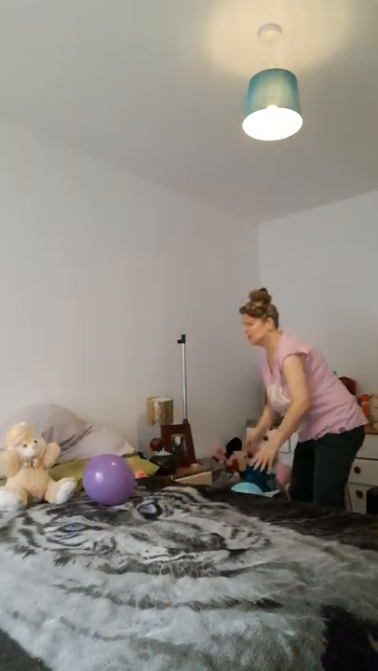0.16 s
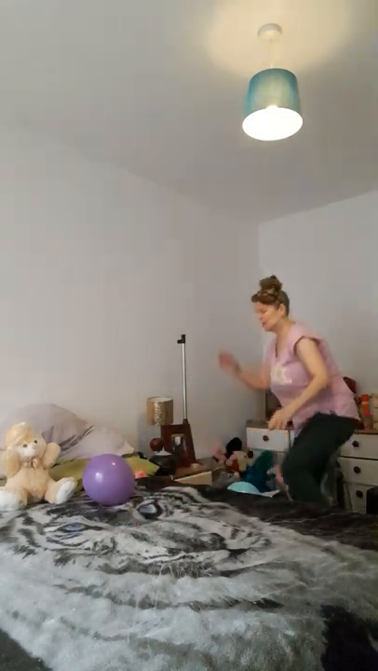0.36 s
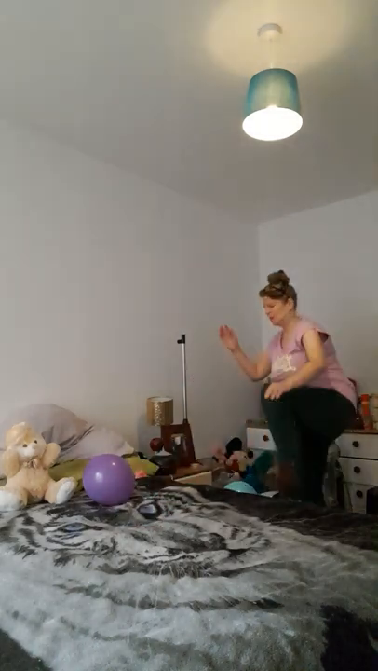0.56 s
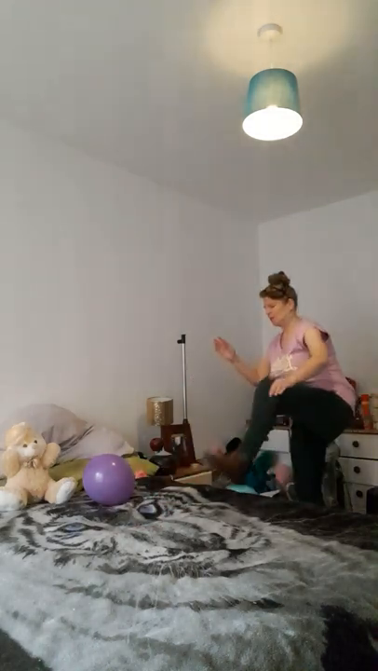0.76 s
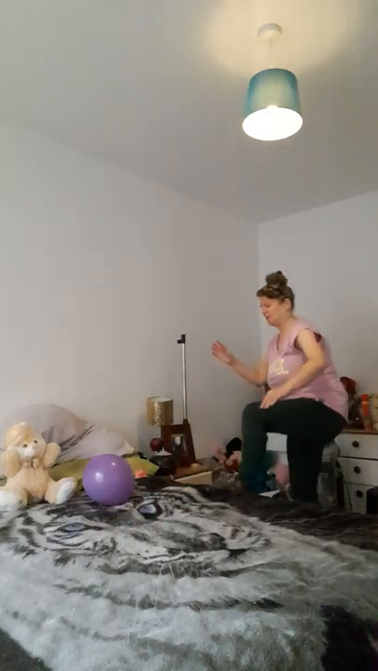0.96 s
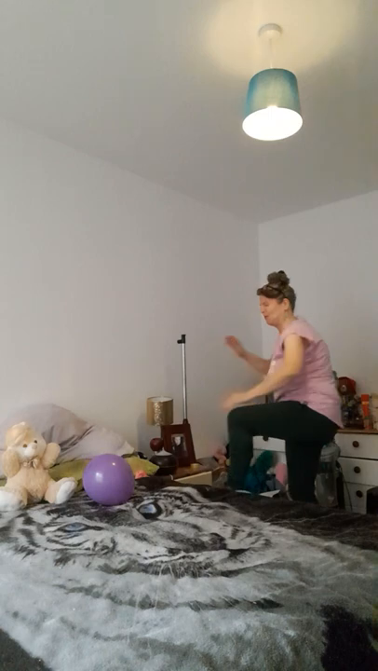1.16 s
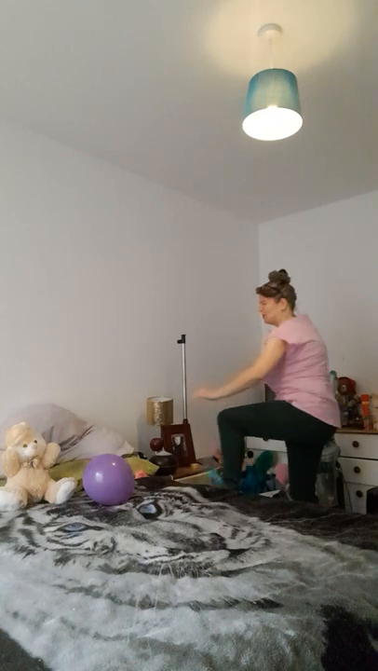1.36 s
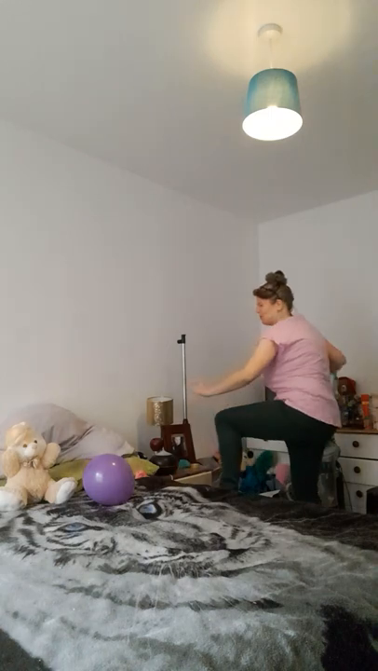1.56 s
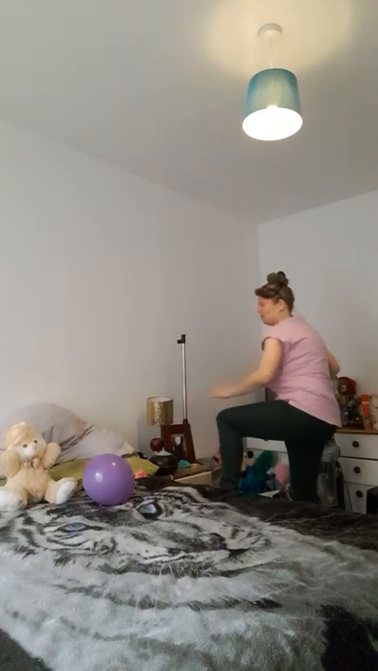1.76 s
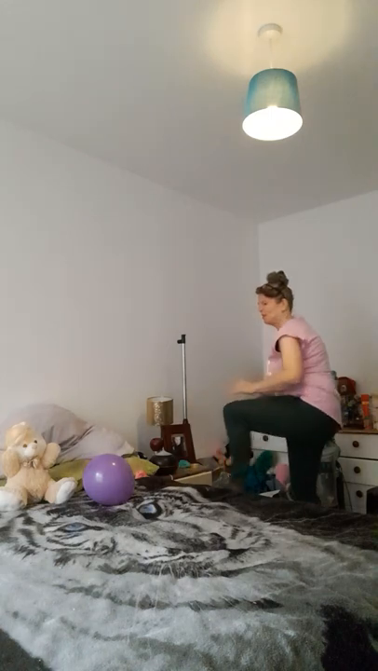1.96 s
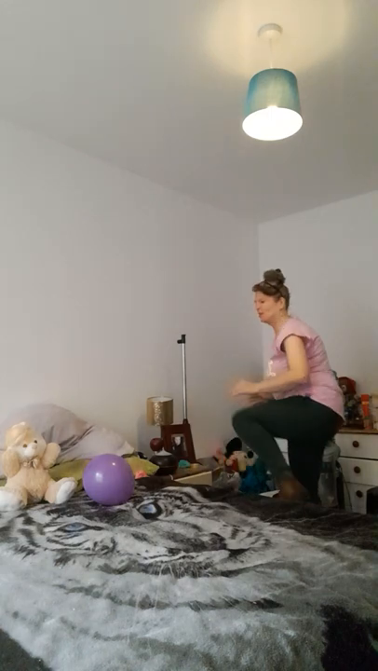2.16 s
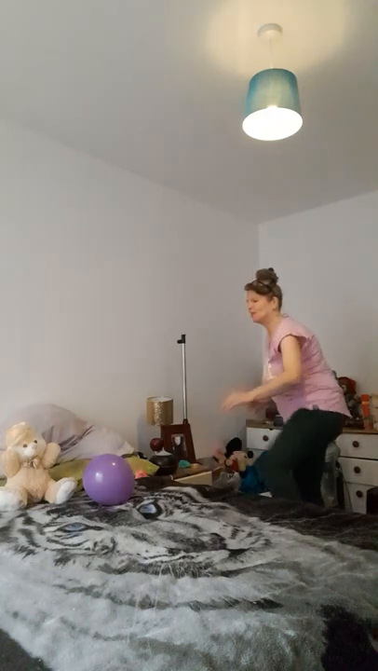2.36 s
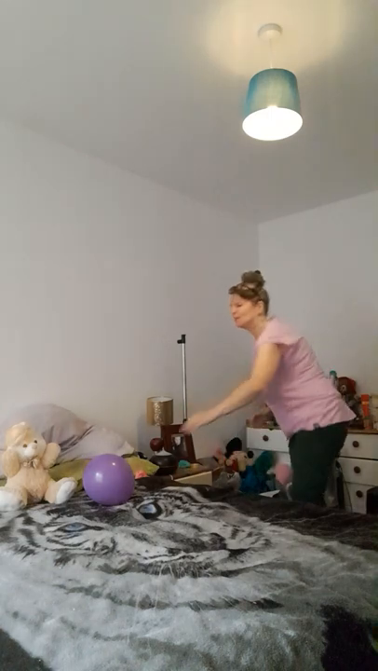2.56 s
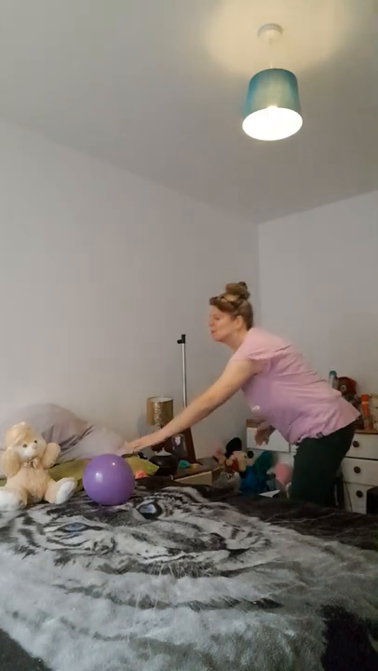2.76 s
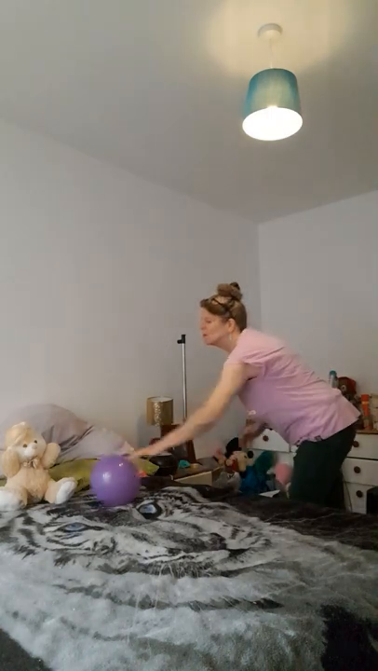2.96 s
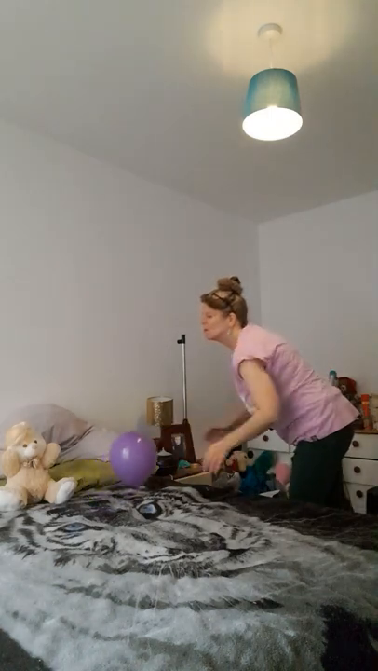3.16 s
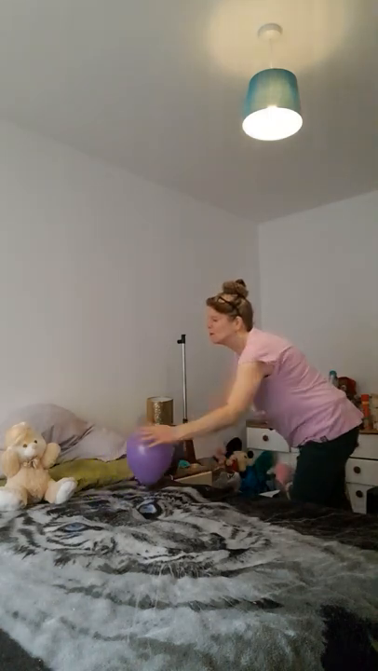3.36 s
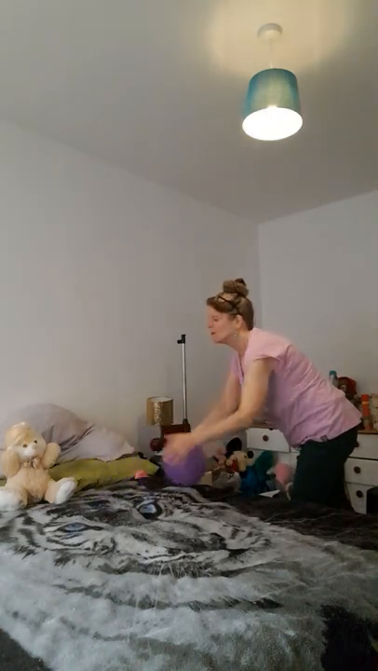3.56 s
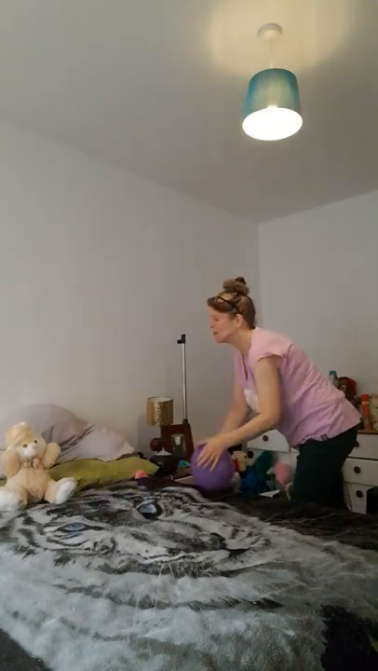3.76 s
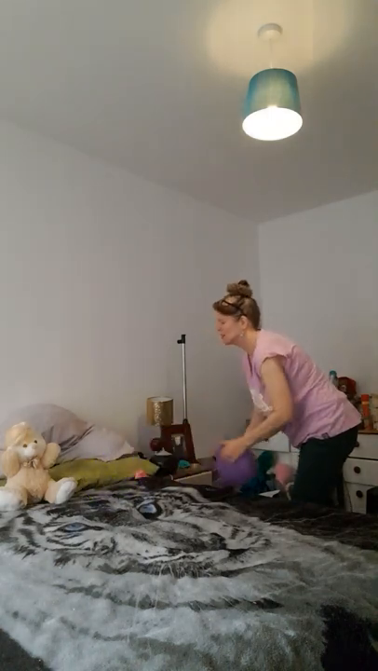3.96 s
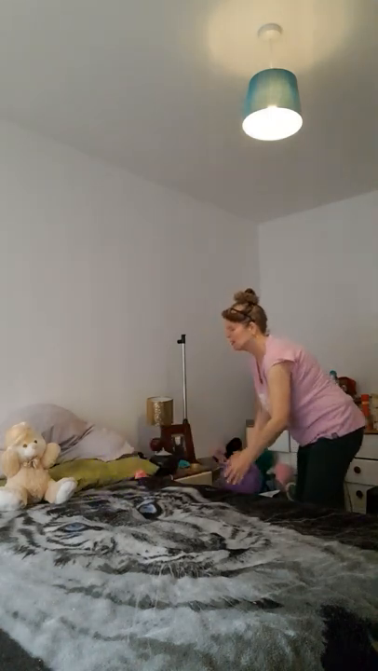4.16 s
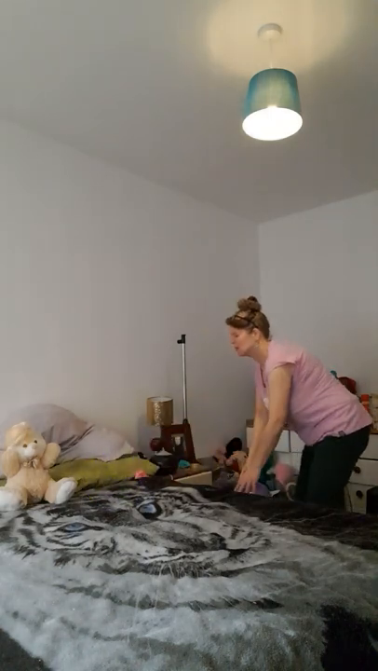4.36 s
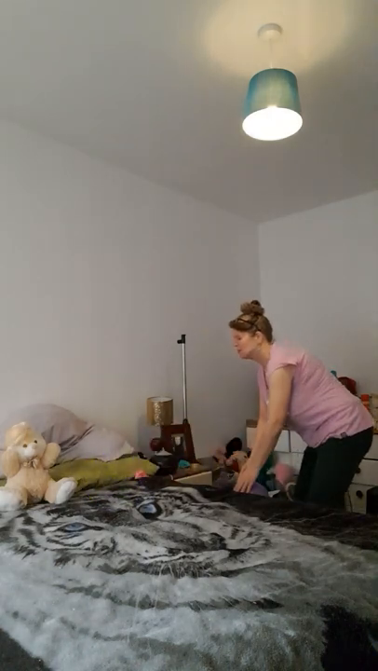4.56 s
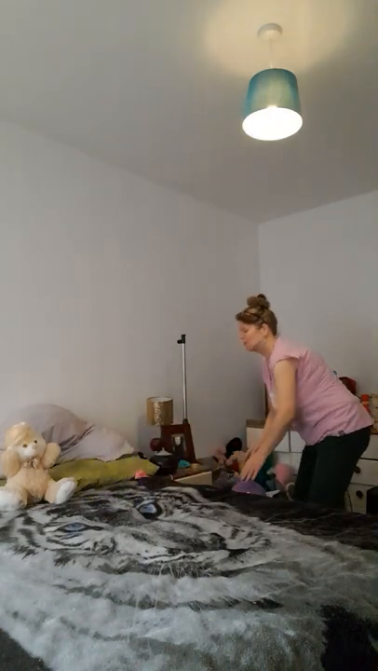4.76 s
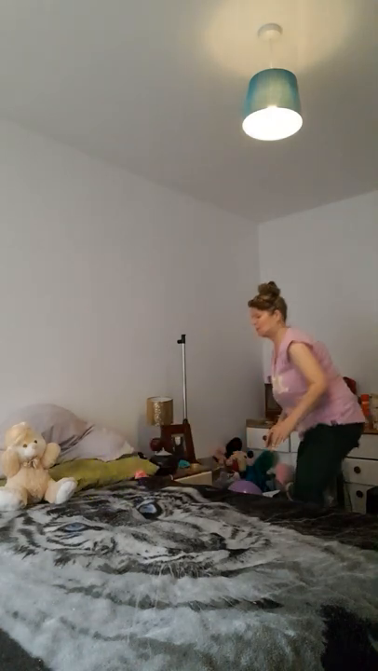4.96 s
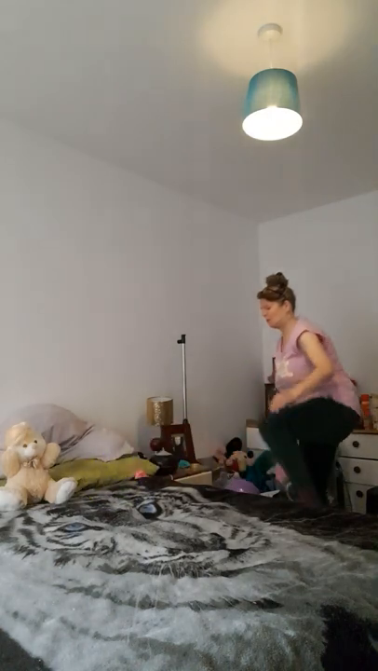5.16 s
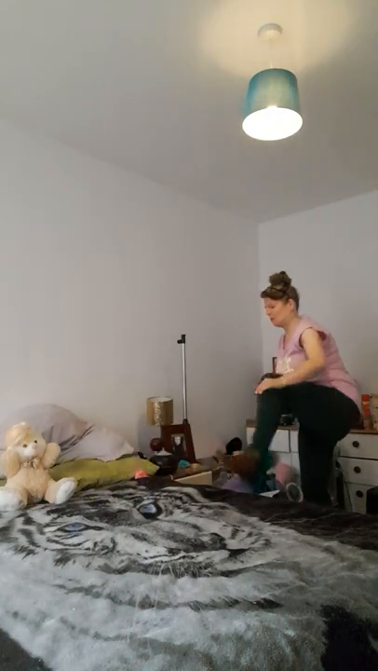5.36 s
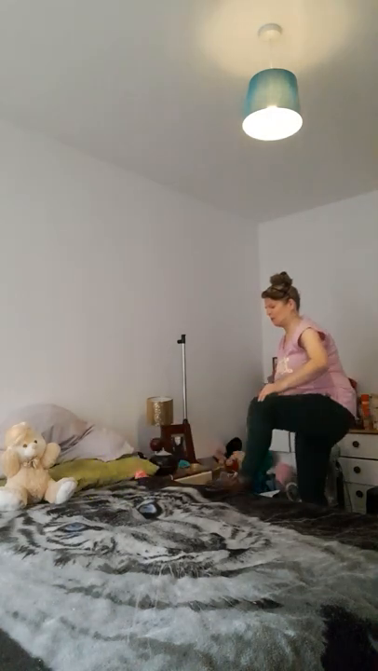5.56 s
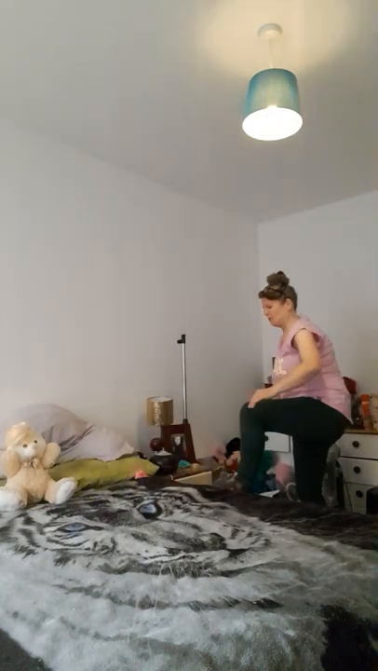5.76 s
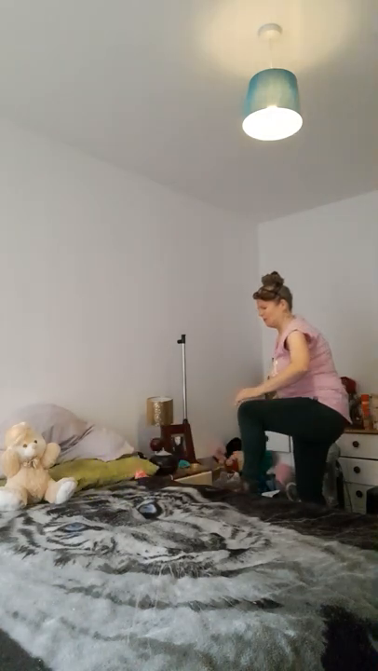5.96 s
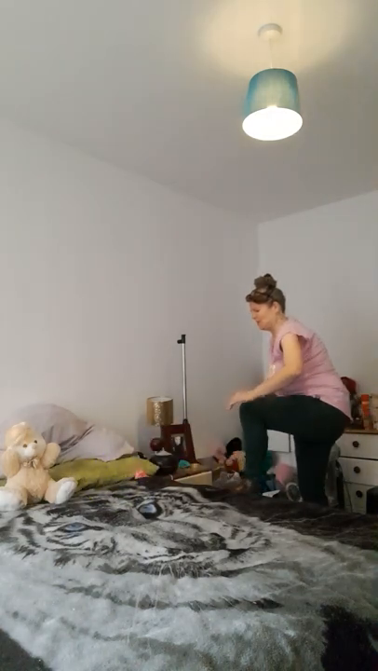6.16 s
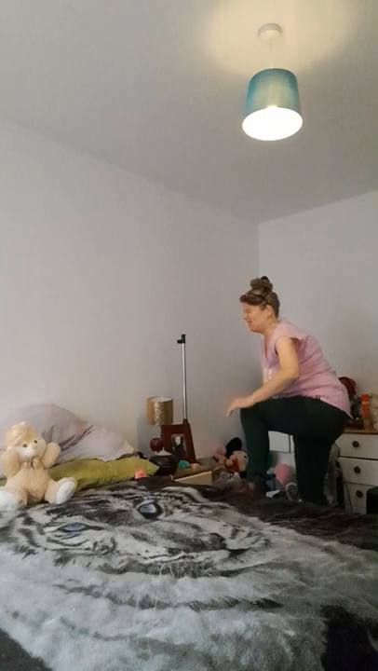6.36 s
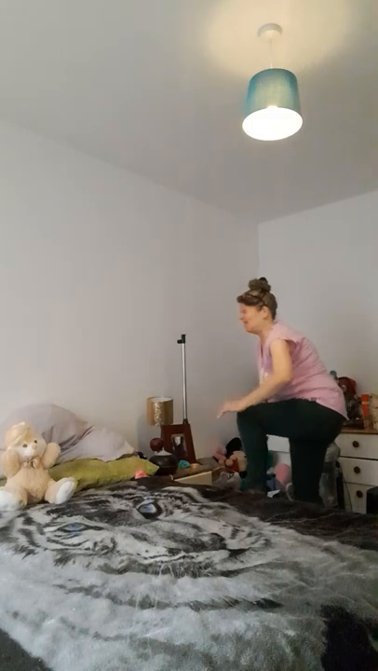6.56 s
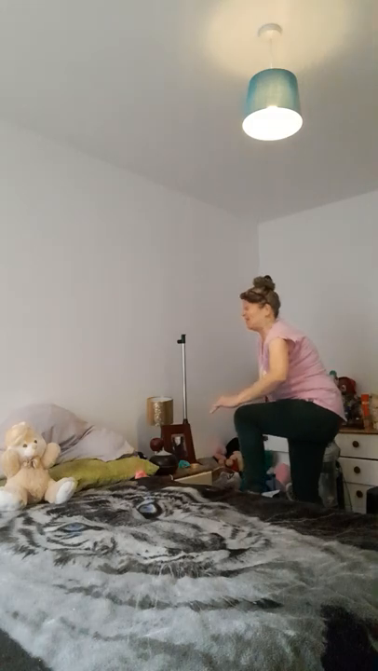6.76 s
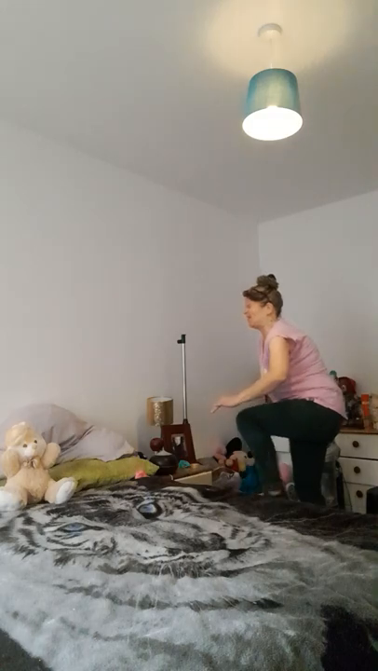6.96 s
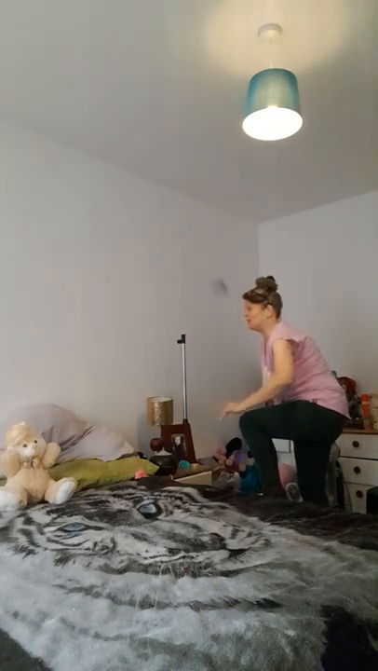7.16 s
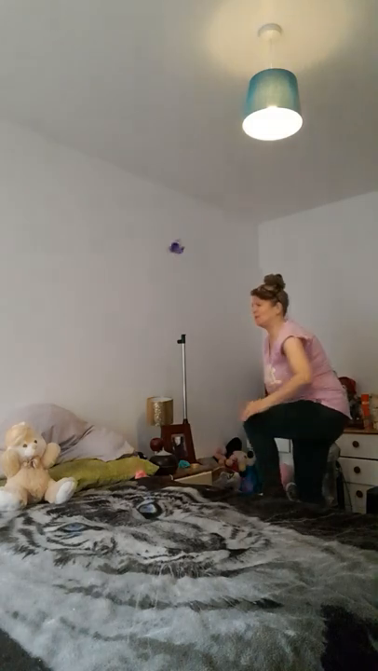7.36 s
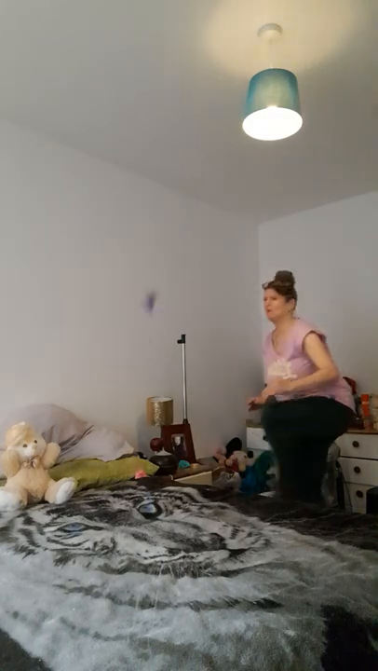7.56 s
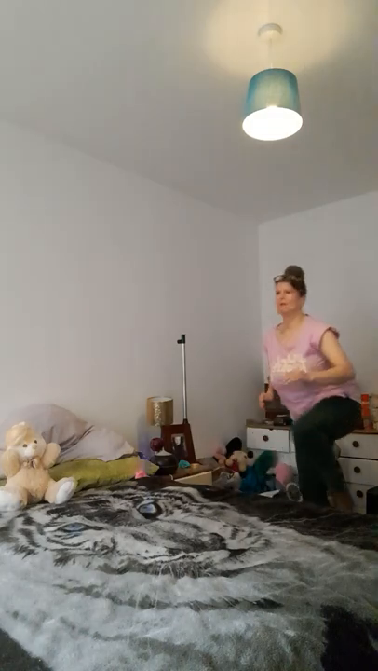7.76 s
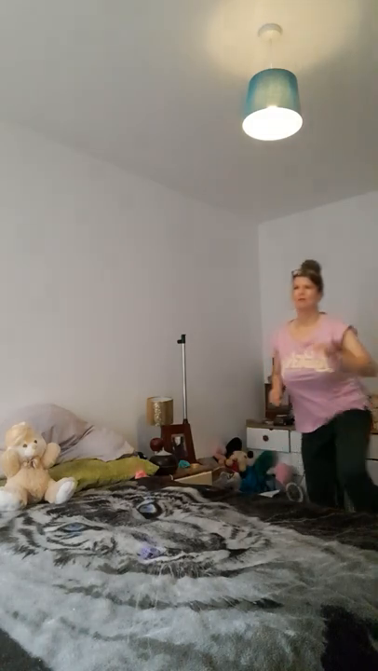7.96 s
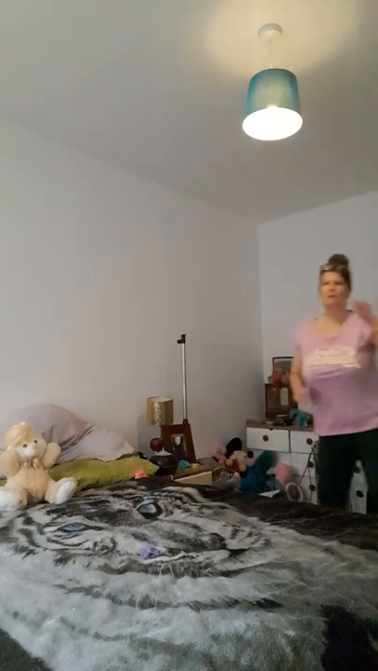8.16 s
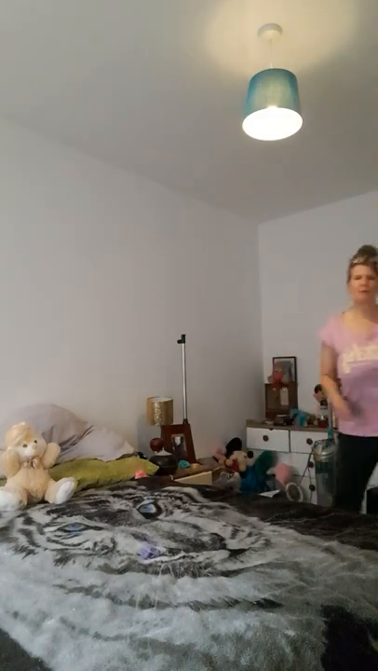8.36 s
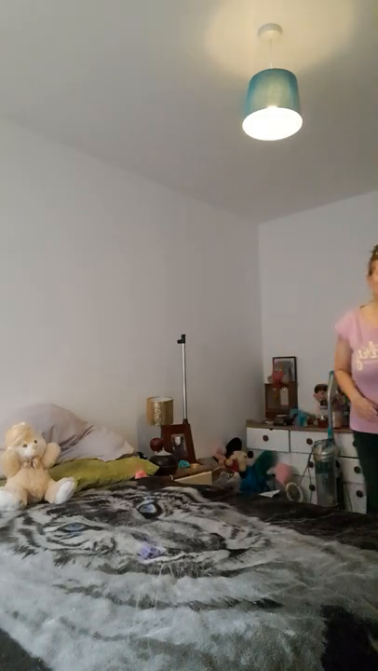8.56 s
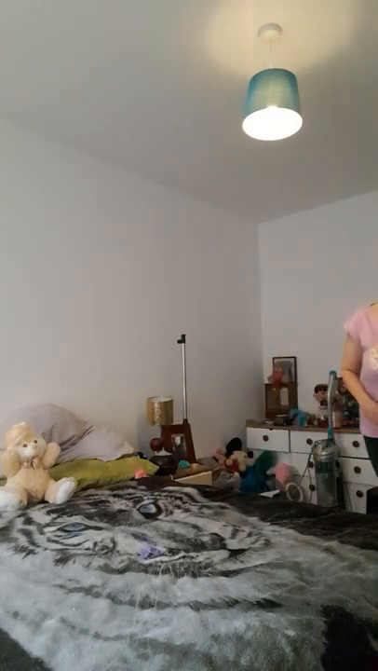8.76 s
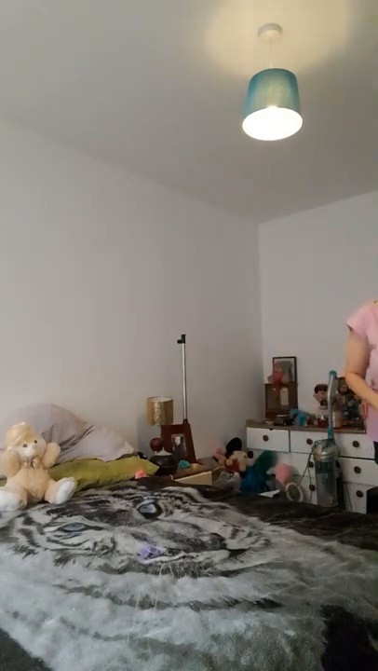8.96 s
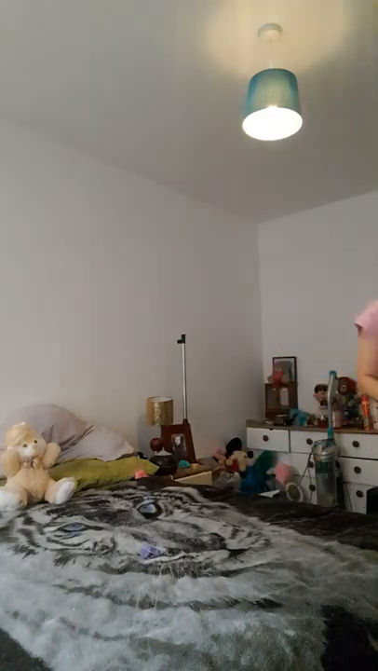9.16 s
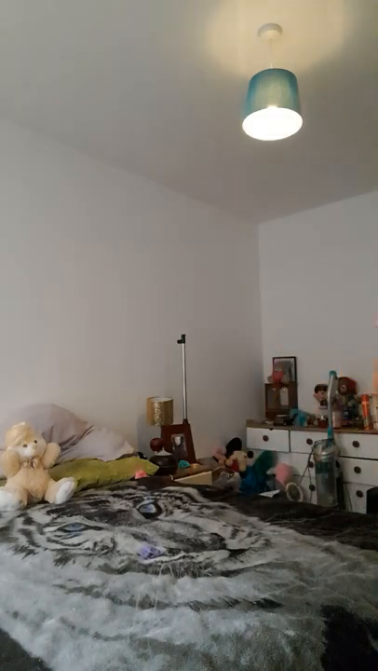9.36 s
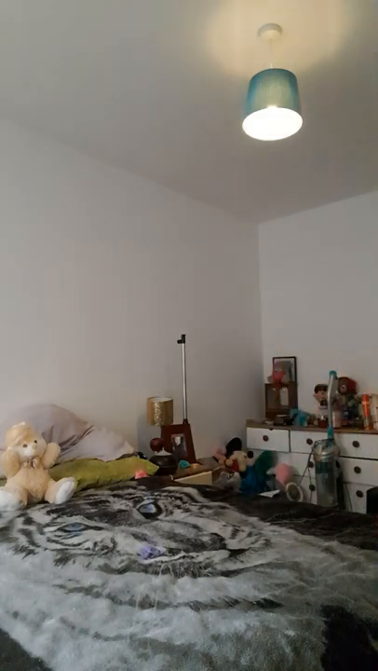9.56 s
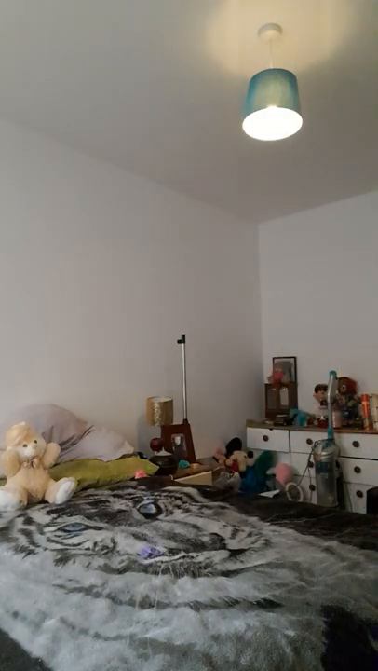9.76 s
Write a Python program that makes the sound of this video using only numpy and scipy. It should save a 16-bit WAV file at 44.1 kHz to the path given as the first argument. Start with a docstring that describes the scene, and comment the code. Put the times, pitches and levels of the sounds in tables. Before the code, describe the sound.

Two violent balloon bangs stand out from near silence, each ringing around bare walls and ceiling for about half a second. Before and between them come low foot thumps, small slaps, cloth rustle and rubbery knocking on floor and bed. The second bang is a little lower and duller. Afterwards only faint steps and shuffles remain over low room tone and hiss. Stereo phone pickup, a few metres away.

```python
"""Two balloons trodden to bursting

Small bedroom: the balloons burst on the floor behind a bed, and a two-port phone lies across the bed.
Each bang, a short swelling sine, comes dull round the bed, then bright off ceiling and walls as
coloured noise that dies band by band, with the room's modes ringing. Gliding notes thump and filtered noise
shuffles between, for feet and rubber; the phone's gain control ducks after each bang and creeps back."""
import sys
import numpy as np
from scipy import signal
from scipy.fft import rfft, irfft
from scipy.io import wavfile
from scipy.ndimage import uniform_filter1d

SR = 44100
rng = np.random.default_rng(int(sys.argv[2]) if len(sys.argv) > 2 else 0)


def store_pcm(level_fs):
    """Save levels as 16-bit WAV."""
    pcm = np.round(np.clip(level_fs, -1, 1) * 32767).astype(np.int16)
    wavfile.write(sys.argv[1], SR, np.atleast_2d(pcm).T)


N = 433062  # samples
CEILING_S = .0062  # first clear path by way of the ceiling, after the bang's own start

# The two bursts behind the bed: (t/s, level/dB of the bang round the bed, f/Hz of its pitch, room level/dB,
# room tilt/dB per octave, room bass/dB, snap near 2 kHz/dB)
BURSTS = [(1.4158, 3.5, 682.3, -0.5, 2, 2, 4), (7.0283, 1.5, 535, -0.5, 1.5, -4.5, -2.5)]
# The bang again off the ceiling, one row per burst: (delay t/s, level/dB)
CEILING_BOUNCES = [(.0068, -7), (.0078, -8)]
BANG_CYCLES = 0.4  # the ball of air peaks after this many cycles
CEILING_RISE_S = .0009
ROUND_BED = 0.32  # share of the echo that comes before the first clear path
CEILING_DB = 4.5  # the first clear paths stand above the diffuse tail in the treble


def bursts():
    """The skin tears, a ball of air springs free in a short pulse, and the room answers."""
    out = np.zeros((2, N))
    t = np.arange(SR) / SR
    clear = 1 / (1 + np.exp(np.maximum((CEILING_S - t) / CEILING_RISE_S, -50)))
    round_bed = ROUND_BED * np.minimum(2 * t / CEILING_S, 1) ** 2
    arrival = clear + (1 - clear) * round_bed
    for spot, (s, db, hz, room_db, tilt_db, bass_db, snap_db) in enumerate(BURSTS):
        swell = hz * t / BANG_CYCLES
        envelope = undb(db) * swell * np.exp(1 - swell)
        bang = envelope * np.sin(2 * np.pi * hz * t) * np.ones((2, 1))
        add(out, bang, s)
        bounce_s, bounce_db = CEILING_BOUNCES[spot]
        add(out, undb(bounce_db) * bang, s + bounce_s)
        walls = echo(tilt_db, bass_db, snap_db, early_db=CEILING_DB) + standing(spot)
        add(out, undb(room_db) * arrival * walls, s)
    return out


# Colour of the bedroom's diffuse tail: (f/Hz, level/dB per Hz)
ROOM_COLOUR = [(25, -28), (40, -9.5), (65, -9.5), (110, -8), (190, -5), (270, 1.5), (600, -7.5),
               (1130, -12.5), (1900, -17.5), (4270, -31.5), (6300, -47), (8200, -63.5), (12500, -48),
               (15700, -48.5)]
# Decay of the tail before its closing fade: (f/Hz, 60 dB decay t/s)
ROOM_T60 = [(60, 1), (150, 0.57), (300, 0.46), (600, 0.61), (1500, 0.6), (4000, 0.5), (8000, 0.52),
            (13000, 0.28)]
CEILING_FADE_S = 0.0049  # time constant of the early lift's dB value


def echo(tilt_db, bass_db=0, snap_db=0, damp=1, early_db=0, snap_hz=1800):
    """Diffuse echo of a click: noise whose bands die at their own rate."""
    t = np.arange(SR) / SR
    hz = np.fft.rfftfreq(SR, 1 / SR) + 1
    colour_db = on_hz(ROOM_COLOUR, SR) + tilt_db * np.log2(hz / 500)
    colour_db = colour_db + bass_db / (1 + (hz / 200) ** 4)
    colour_db = colour_db + snap_db * np.exp(-(np.log2(hz / snap_hz) / 0.39) ** 2)
    noise = rfft(pair(undb(colour_db), SR))
    early_db = early_db * np.exp(-np.maximum(t - CEILING_S, 0) / CEILING_FADE_S)
    t60 = on_hz(ROOM_T60, SR) / damp
    tail = 0
    for centre in 30 * 2 ** np.arange(0, 9.5, .5):  # half-octave bands
        band = np.clip(1 - 2 * np.abs(np.log2(hz / centre)), 0, 1)
        # the early lift grows up to 6 kHz
        fade_db = -60 * t / t60[int(centre)] + early_db * min(centre / 6000, 1)
        tail = tail + irfft(noise * band, SR) * undb(fade_db)
    return tail * (1 - t)


# Standing waves of the bedroom: (f/Hz)
MODE_HZ = [62.5, 92, 141, 254, 275, 326, 381, 421, 460, 517, 569, 609, 645, 683, 712, 834, 897, 968, 1072]
# Their decay before the closing fade, one entry per mode: (60 dB decay t/s)
MODE_T60_S = [.7, .5, .6, .36, .35, .4, .3, .4, .27, .6, .55, .38, .45, .5, .5, .45, .45, .45, .52]
# Their relative strength, one row per mode: (level/dB from the first spot, level/dB from the second)
MODE_RING = [(-10, -18), (-8, -21), (-5, -10), (-1, -7), (-6, -7), (-4, 2), (-7.5, -7), (-13.5, -8),
             (-8.5, -10), (-5, -6.5), (-8, -7), (-6.5, -8), (-10.5, -9.5), (-12.5, -22.5), (-11, -19),
             (-13.5, -14.5), (-14.5, -25), (-13.5, -20.5), (-19, -17)]
MODES_DB = -1
MODE_SPLIT = 0.033  # a weaker neighbour lies up to this share away, so the pair beats


def standing(spot):
    """The strongest standing waves, as excited from one spot on the floor."""
    t = np.arange(SR) / SR
    ring = 0
    chance = rng.random((len(MODE_HZ), 3))  # two phases and the neighbour's place
    for hz, t60, row, (a, b, c) in zip(MODE_HZ, MODE_T60_S, MODE_RING, chance):
        twin_hz = hz * (1 + MODE_SPLIT * (2 * c - 1))
        wave = np.sin(2 * np.pi * (hz * t + a))
        twin = 0.1 * np.sin(2 * np.pi * (twin_hz * t + b))
        ring = ring + undb(row[spot] - 60 * t / t60) * (wave + twin)
    rise = np.sin(np.pi / 2 * np.minimum(t / CEILING_S, 1)) ** 2
    return ports(undb(MODES_DB) * ring * rise) * (1 - t)


# Thumps of feet and balloon on floor and bed: (t/s, peak level/dB of the near sound, starting f/Hz,
# glide ratio, rise t/s, 60 dB decay t/s)
THUMPS = [(0.815, -38.5, 130, 0.89, .01, .15), (.851, -25, 79.1, 1.98, .047, .24),
          (0.991, -41, 69.68, 2.6, .018, .25), (1.136, -30, 142.9, 1.16, .012, .15),
          (1.138, -27.5, 300.4, 0.74, .006, .064), (1.148, -30.5, 109.4, 0.53, .01, .15),
          (1.255, -40.5, 308.8, 1.01, .015, .12), (1.26, -38, 89.4, 0.59, 0.011, .13),
          (2.58, -33, 301, 1.31, .0062, 0.03), (2.608, -45, 252.7, 1.07, 0.0052, 0.19),
          (2.95, -51.5, 130.1, .98, .0089, 0.12), (3.314, -43, 69.7, 1.01, 0.0048, 0.13),
          (3.508, -41, 90, 0.77, 0.0078, 0.11), (3.55, -34, 65.8, 0.71, 0.017, 0.093),
          (3.603, -38, 68.3, 0.87, .006, 0.14), (3.66, -21, 70, 0.88, .045, 0.21),
          (3.671, -30.5, 136.4, .95, 0.017, 0.22), (3.798, -44, 66.1, 1.16, .017, 0.12),
          (4.307, -26.5, 62.04, 1.44, .0055, 0.19), (4.346, -33.5, 65.8, 1.12, 0.013, 0.17),
          (4.4, -29, 78.7, 1.6, .014, 0.087), (4.456, -34, 62, 0.65, 0.014, 0.073),
          (5.13, -46, 60.85, 1.27, .014, 0.48), (5.247, -40, 75.4, .58, 0.022, 0.28),
          (5.48, -40.5, 63.3, 0.72, 0.054, .6), (5.5, -27.5, 71.8, 0.92, .02, .2),
          (5.552, -24.5, 88, 0.81, 0.01, 0.15), (5.62, -38.5, 74.4, 1.57, .014, 0.41),
          (6.612, -39, 139.5, 1, .008, .137), (6.615, -37.5, 299.2, 1.15, .008, 0.2),
          (8.154, -54, 265, 0.74, 0.007, 0.12), (8.814, -41, 305.6, 1.7, 0.0061, 0.091),
          (9.37, -52, 71, 1.02, .02, .25)]
THUMP_ROOM_DB = -8.5


def thumps():
    """Soft blows: a low note that swells with the push, glides in pitch, and dies."""
    near = np.zeros((1, N))
    t = np.arange(SR // 2) / SR
    for s, db, hz, glide, rise, t60 in THUMPS:
        shape = (1 - np.exp(-(t / rise) ** 2)) * undb(-60 * t / t60)
        pitch = hz * glide ** np.minimum(t / .1, 1)  # the glide takes 0.1 s
        note = shape / shape.max() * np.sin(2 * np.pi * np.cumsum(pitch) / SR)
        add(near, undb(db) * note[None], s)
    walls = echo(0) + standing(0)
    walls = walls / np.abs(rfft(walls))[:, 50:400].mean()  # unit mean gain, 50-400 Hz
    wet = signal.fftconvolve(near, walls, axes=1)[:, :N]
    return ports(near[0]) + undb(THUMP_ROOM_DB) * wet


# Slaps of hand, foot or rubber that only the room carries over the bed:
# (t/s, level/dB, tilt/dB per octave, body f/Hz, body level/dB)
SLAPS = [(.481, -67, -2, 1480, 12), (.818, -69, -3, 700, 11), (1.134, -48.5, -3.5, 1200, 4.5),
         (2.585, -59, 3, 4070, 3), (3.506, -43, -3.5, 790, 11), (3.662, -37, -5, 730, 11),
         (3.759, -58, -1.5, 3520, 5), (4.019, -66, 9, 1740, 22), (4.33, -56.5, 2, 3440, 7.5),
         (5.217, -52.5, -6, 1510, 6), (5.486, -49.5, -0.5, 1500, 4), (6.614, -45.5, 4.5, 1760, 6),
         (8.155, -51.5, -5, 700, -18), (8.813, -55, -5, 691, 1.5), (9.305, -59.5, 5.5, 2540, 21.5),
         (9.491, -60, 0, 2660, 10.5)]
SLAP_DAMP = 1  # divides the echo's decay time; above 1, bedding near the blow would shorten it
SLAP_RISE_S = .002


def slaps():
    """Small blows, heard as short echoes coloured by the thing that was hit."""
    out = np.zeros((2, N))
    rise = 1 - np.exp(-(np.arange(SR) / SR / SLAP_RISE_S) ** 2)
    for s, db, tilt_db, body_hz, body_db in SLAPS:
        walls = echo(tilt_db, 0, body_db, SLAP_DAMP, snap_hz=body_hz)
        add(out, undb(db) * rise * walls, s - SLAP_RISE_S)
    return out


# Floor rumble over time: (t/s, level/dB)
FLOOR = [(0, -56), (.3, -61), (0.761, -74), (.84, -46), (1.39, -53.5), (1.95, -53), (2.12, -58.5),
         (2.2, -68), (2.55, -68), (2.92, -73.5), (3.26, -67.5), (3.6, -55.5), (3.72, -38), (3.9, -63),
         (4.08, -60), (4.28, -69.5), (4.4, -44), (4.551, -61.5), (5.0, -67), (5.302, -51.5), (5.55, -42.5),
         (5.85, -59), (6.299, -64.5), (7.0, -58.5), (7.62, -51), (7.68, -76), (8.16, -78.5), (8.65, -63.5),
         (9.2, -72.5), (9.46, -65), (9.82, -71)]
# Resonances of the shaken floor: (f/Hz, width/Hz, level/dB)
RUMBLE = [(60, 30, 2.5), (95, 23, -4), (142, 65, -2)]
# Resonances of knocking rubber and bedding: (f/Hz, width/Hz, level/dB)
KNOCK = [(247, 88, 2), (315, 96, 2.5), (475, 67, -6.5), (606, 390, -7.5)]
# Colour of rustling cloth and skin: (f/Hz, level/dB per Hz)
RUSTLE = [(400, -27), (700, -7), (1000, 2.5), (1500, 0), (2500, -10), (4400, -21), (6200, -32),
          (8000, -45.5), (13000, -33.5), (15700, -31.5)]
# Where rubbed rubber rings: (f/Hz, width/Hz, level/dB)
RUBBER = [(1679.4, 840, 1), (2370, 360, -7)]
RUSTLE_GRAIN_DB = 0.5  # mean of the random dB draw per grain, before levelling and smoothing
SHAKE_DB = -3  # rumble that each knock adds
BRIGHT_AT_HZ = 2400


def shuffle():
    """Weight shifts shake the floor, rubber and bedding knock, cloth and skin rustle in fine grains."""
    knock, rustle, bright, rub = moves()
    floor_db = np.interp(np.arange(N) / SR, *np.transpose(FLOOR))
    rumble = np.hypot(undb(floor_db), undb(SHAKE_DB) * knock)
    grain_db = RUSTLE_GRAIN_DB * np.repeat(rng.exponential(size=N // 128 + 1), 128)[:N]
    grain = uniform_filter1d(unit(undb(grain_db)), size=64)
    cloth = pair(undb(on_hz(RUSTLE, N)), N) * grain
    low_pass = 1 + (np.fft.rfftfreq(N, 1 / SR) / BRIGHT_AT_HZ) ** 4
    dull = irfft(rfft(cloth) / low_pass, N)
    cloth = rustle * dull + bright * (cloth - dull)  # quick sliding raises the upper half
    rubber = .5 * rub * grain * pair(humps(RUBBER), N)
    return rumble * pair(humps(RUMBLE), N) + knock * pair(humps(KNOCK), N) + cloth + rubber


# Shuffling movements, each a swell and a fade: (peak t/s, swell t/s, fade t/s, knocking level/dB,
# rustle level/dB, its brightness/dB on top, its rubber ring/dB on top before shuffle() halves the ring)
MOVES = [(.005, 0.044, 0.36, -62.5, -77, 0, 14), (.5, .03, 0.18, -64, -66.5, -20, 0.5),
         (.824, 0.02, 0.43, -52, -67.5, -10, -2), (.99, 0.097, 0.25, -44.5, -50.5, 2, -5),
         (1.144, 0.047, 0.088, -39.5, -53.5, 9, -4), (1.273, 0.14, 0.16, -46.5, -55.5, 1.5, -4),
         (1.385, 0.11, 0.044, -47, -68, 9, 5), (2.12, 0.44, 0.13, -61.5, -60, -8.5, -5),
         (2.28, .2, 0.24, -66, -66, -5.5, 7), (2.581, 0.021, 0.24, -50.5, -74, 1, -4.5),
         (3.1, .2, .25, -66.5, -85, -2, -3.5), (3.34, 0.079, 0.24, -56.5, -81.5, -3.5, -4.5),
         (3.508, 0.0043, 0.21, -47.5, -54.5, -19, -6), (3.668, 0.0087, 0.24, -45, -52, -11.5, -12),
         (3.8, 0.17, .12, -53.5, -60.5, 8.5, -11.5), (4.05, 0.056, 0.51, -60, -67, 0, 4.5),
         (4.2, 0.28, 0.23, -72.5, -73.5, 1.5, 9.5), (4.33, 0.043, 0.26, -48.5, -54.5, 11, -18.5),
         (4.41, 0.14, 0.082, -43, -62, 21, 4), (4.55, 0.13, 0.53, -63, -73.5, 0.5, -2),
         (4.95, .4, 0.23, -68.5, -82.5, -5, -8), (5.225, 0.024, 0.089, -53.5, -63.5, -3, -1),
         (5.28, 0.13, 0.25, -54.5, -61.5, -4, -15), (5.495, 0.01, 0.11, -44.5, -63, 2, -6),
         (5.59, 0.028, 0.18, -48.5, -61, -2.5, -1), (5.7, 0.12, 0.27, -53.5, -59.5, -3, -8),
         (5.9, 0.1, 0.13, -57, -64.5, -4.5, 2.5), (6.02, .1, 0.21, -56.5, -63, -6, -7),
         (6.28, 0.14, .35, -64.5, -67, 0.5, -8.5), (6.53, 0.18, 0.43, -54.5, -56.5, -6, -5.5),
         (6.58, 0.057, 0.24, -51.5, -52.5, 3, 0), (6.615, 0.0054, .11, -41.5, -45, 4.5, 6.5),
         (6.75, 0.12, 0.27, -49, -55.5, -0.5, -7), (6.95, 0.055, 0.24, -47.5, -45.5, 5, 3.5),
         (7.489, .2, 0.33, -55.5, -62.5, 1, -7), (8.17, 0.028, .25, -56.5, -91, -1, -3.5),
         (8.37, 0.059, .15, -80.5, -70, 1.5, 5), (8.44, .07, 0.19, -58, -68, 0.5, -0.5),
         (8.61, .03, 0.22, -54.5, -65.5, 2.5, 5), (8.68, .05, 0.15, -55, -65, 3, 1.5),
         (8.83, .05, 0.11, -54, -73, 7, -2), (8.99, .1, 0.22, -70, -69.5, 3, 7),
         (9.31, 0.031, 0.26, -64.5, -62, 6.5, 3), (9.391, 0.13, 0.091, -48, -63, 10, 2),
         (9.499, 0.063, 0.23, -53.5, -61.5, 3.5, 2), (9.8, .4, .2, -72.5, -75, 0, -3)]
MOVE_EDGE_DB = 20.5  # drop from the peak at one swell or fade time away
MOVE_ROUND = 1.3  # power of time in swell and fade: above 1 the peak is rounded
KNOCK_QUICK = 1.2  # knocking drops this many times as many dB as rustle


def moves():
    """Gains of knocking, rustle, its upper half and the rubber ring: swells summed in power."""
    t = np.arange(0, N, 64)[:, None] / SR
    s, swell, fade, knock_db, rustle_db, bright_db, rub_db = np.transpose(MOVES)
    away = np.maximum((s - t) / swell, (t - s) / fade)
    down_db = -MOVE_EDGE_DB * away ** MOVE_ROUND
    layers = [knock_db + KNOCK_QUICK * down_db]
    layers += [rustle_db + more + down_db for more in (0, bright_db, rub_db)]
    gains = [np.sqrt(np.sum(undb(2 * db), axis=1)) for db in layers]
    return [np.interp(np.arange(N) / SR, t[:, 0], gain) for gain in gains]


# Colour of the room tone: (f/Hz, level/dB per Hz)
QUIET = [(25, -13), (53, 1), (124, -2.5), (206, -19), (245, -12), (600, -17), (775, -18), (880, -21.5),
         (1075, -20.5), (1350, -26), (2000, -35), (6000, -52.5), (8000, -73)]
# Faint wavering tones: (f/Hz, width/Hz, level/dB)
HUM = [(248, 23, 0), (776, 6, -6), (1075, 12, -11)]
QUIET_DB, HUM_DB = -62, -74


def quiet():
    """Room tone as coloured noise, and a few faint tones as narrow noise bands that waver."""
    room_tone = undb(QUIET_DB) * pair(undb(on_hz(QUIET, N)), N)
    return room_tone + undb(HUM_DB) * pair(humps(HUM), N)


def undb(db):
    """Amplitude ratio of a level in dB."""
    return 10 ** (np.asarray(db) / 20)


def on_hz(table, size):
    """A (f/Hz, value) table read at every bin, straight on a log-frequency axis."""
    hz, value = np.transpose(table)
    return np.interp(np.log(np.fft.rfftfreq(size, 1 / SR) + 1), np.log(hz), value)


def unit(x):
    """Scale to an RMS of one."""
    return x / np.sqrt(np.mean(x ** 2))


def humps(table):
    """Gain of a set of resonances at every bin, summed in power."""
    hz = np.fft.rfftfreq(N, 1 / SR)
    return np.sqrt(sum(undb(2 * db) / (1 + (2 * (hz - f) / w) ** 2) ** 2 for f, w, db in table))


def add(out, x, s):
    """Lay a sound into the scene from time s in seconds."""
    i = round(s * SR)
    out[:, i:i + x.shape[1]] += x[:, :N - i]


# Likeness of noise at the phone's two ports: (f/Hz, share of power common to both)
ALIKE = [(50, 1), (300, .93), (600, 0.97), (1200, 0.26), (3000, 0.13), (12000, 0.15)]


def pair(gain, size, alike=1):
    """Coloured noise at the two ports: a common part that reaches the left first, and a part of their own."""
    share = np.clip(alike * on_hz(ALIKE, size), 0, 1)
    common, left, right = rfft(rng.standard_normal((3, size)))
    own = np.sqrt(1 - share) * np.array([left, right])
    shared = np.sqrt(share) * np.array([common, common * lag(size)])
    return unit(irfft(gain * (shared + own), size))


def ports(x):
    """One near sound at both ports, later at the right."""
    return np.array([x, irfft(rfft(x) * lag(len(x)), len(x))])


# Lead of the left port over the right: (f/Hz, lead t/s)
LEFT_LEAD = [(300, .00014), (700, .00019), (1300, .00036), (15000, .00033)]


def lag(size):
    """The right port hears later, less so in the bass that bends round the phone."""
    return np.exp(-2j * np.pi * np.fft.rfftfreq(size, 1 / SR) * on_hz(LEFT_LEAD, size))


def scene():
    """Everything in the bedroom as it reaches the phone's two ports."""
    return bursts() + thumps() + slaps() + shuffle() + quiet()


DUCK_FROM_DB, DUCK_MOST_DB = -20, 10.5  # threshold, deepest cut
DUCK_ATTACK_S, DUCK_HOLD_S, DUCK_BACK_DB_S = 0.0071, .65, 6.5  # time constant, wait, dB per second


def gain_control(x):
    """A loud sound pulls the gain down; it waits, then climbs back at a steady rate."""
    step = SR // 500  # about 2 ms
    peaks = np.abs(x[:, :N // step * step]).max(axis=0).reshape(-1, step).max(axis=1)
    loud_db = 20 * np.log10(peaks + 1e-9)
    duck_db, now, wait = np.zeros(len(loud_db)), 0., 0.
    for i, db in enumerate(loud_db):
        want = np.clip(db - DUCK_FROM_DB, 0, DUCK_MOST_DB)
        if want > now:
            now += (want - now) * min(step / SR / DUCK_ATTACK_S, 1)
            wait = DUCK_HOLD_S
        elif wait > 0:
            wait -= step / SR
        else:
            now = max(now - DUCK_BACK_DB_S * step / SR, 0)
        duck_db[i] = now
    return x * undb(-np.interp(np.arange(N), step * (1 + np.arange(len(duck_db))), duck_db))


# Colour difference of the two ports: (f/Hz, left minus right level/dB)
BALANCE = [(60, -6), (110, 0.5), (200, -1.5), (380, -3.5), (700, -1.5), (1290, 0), (2380, 7), (4400, 8.5),
           (8120, 4), (13000, 7.5)]
# Colour of the phone's own hiss: (f/Hz, level/dB per Hz)
HISS = [(2000, -13.5), (5000, -9), (8000, -9), (10000, -5.5), (13000, 0), (15700, -8)]
HISS_DB, HISS_ALIKE = -79, 0.25  # level ahead of the gain control, factor on the common share
OVERLOAD = 1.2  # amplitude the soft overload approaches
LOW_HZ, TOP_HZ = 37, 15750  # band edges


def record(dry):
    """The ports differ in colour and hiss; gain control, soft overload and the band edges follow."""
    half_db = on_hz(BALANCE, N) / 2
    coloured = irfft(rfft(dry) * undb([half_db, -half_db]), N)
    hiss = undb(HISS_DB) * pair(undb(on_hz(HISS, N)), N, HISS_ALIKE)
    x = gain_control(coloured + hiss)
    x = x / (1 + (x / OVERLOAD) ** 4) ** .25
    x = signal.sosfilt(signal.butter(4, LOW_HZ, "high", fs=SR, output="sos"), x)
    return signal.sosfilt(signal.ellip(10, .2, 70, TOP_HZ, fs=SR, output="sos"), x)


dry = scene()
out = record(dry)
store_pcm(out)
```